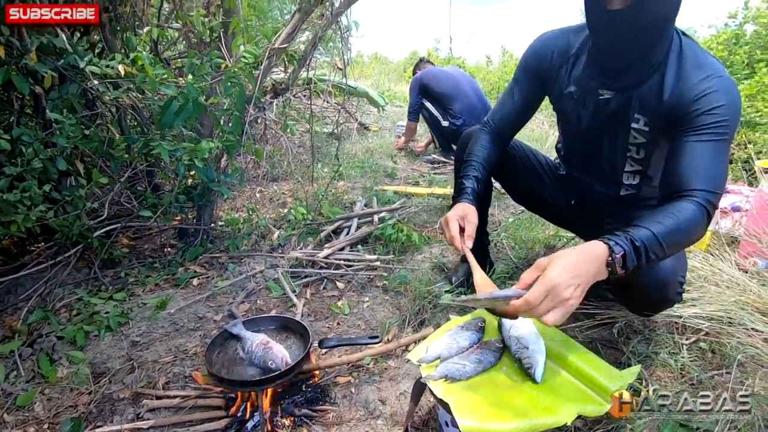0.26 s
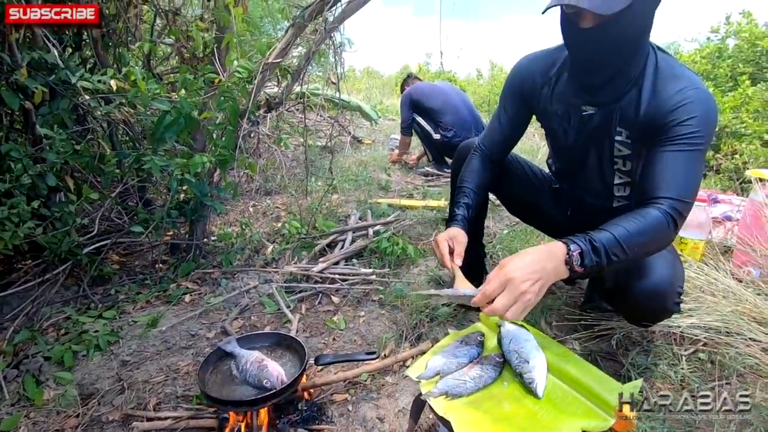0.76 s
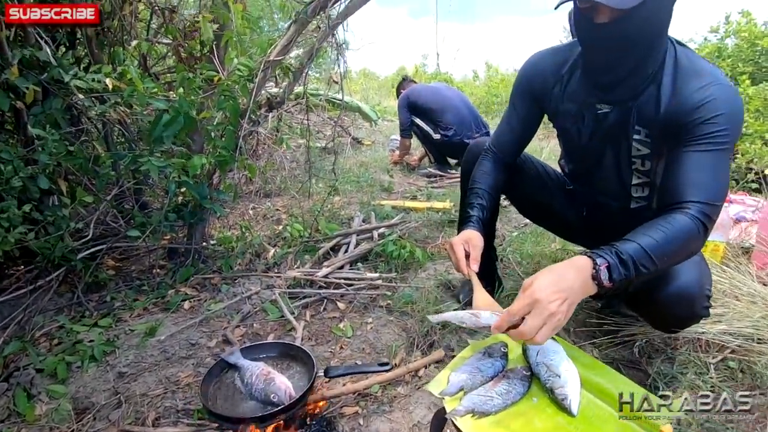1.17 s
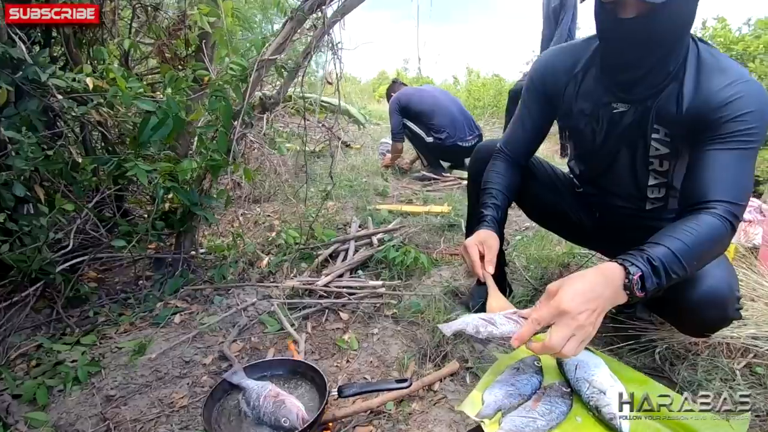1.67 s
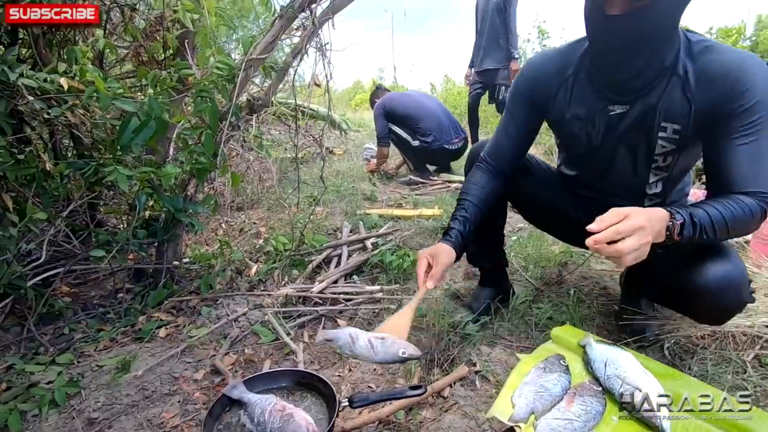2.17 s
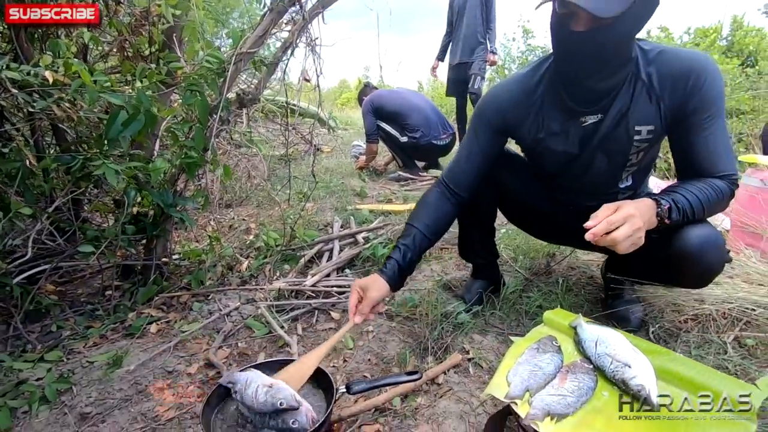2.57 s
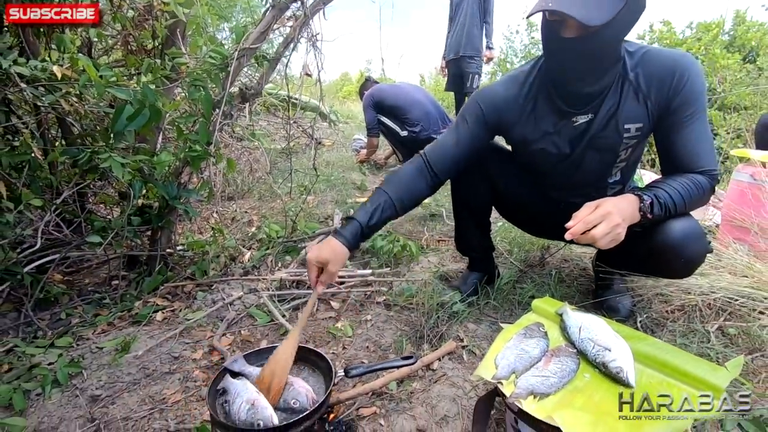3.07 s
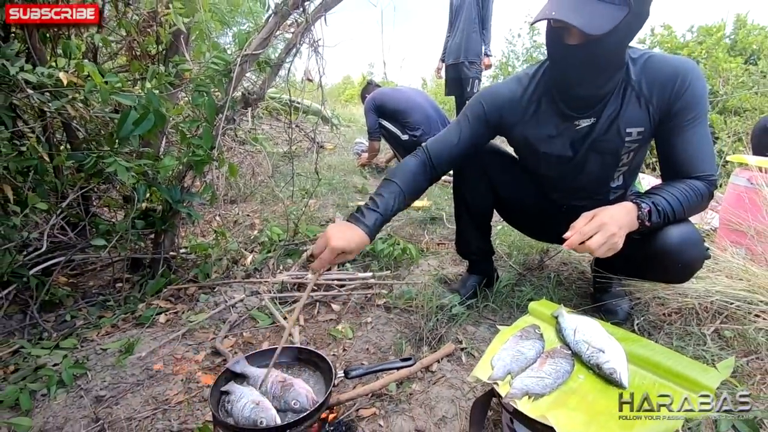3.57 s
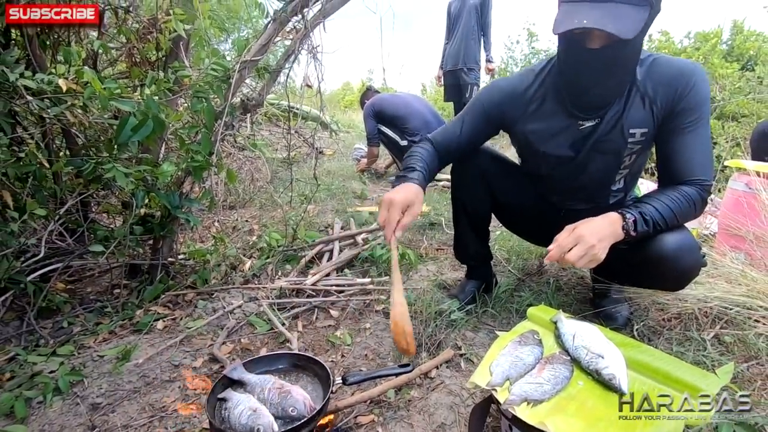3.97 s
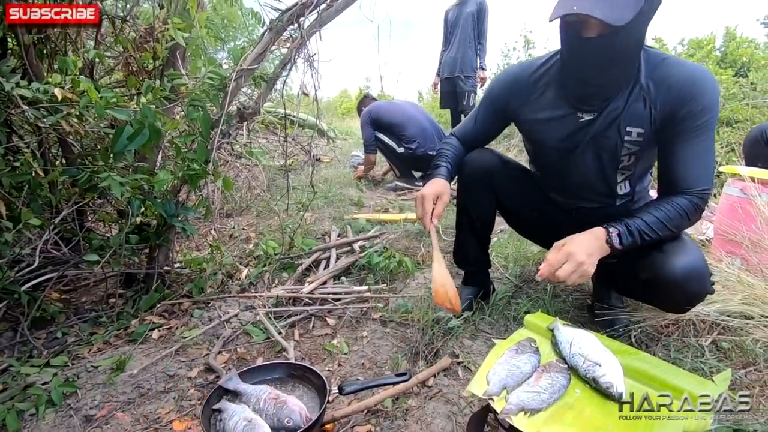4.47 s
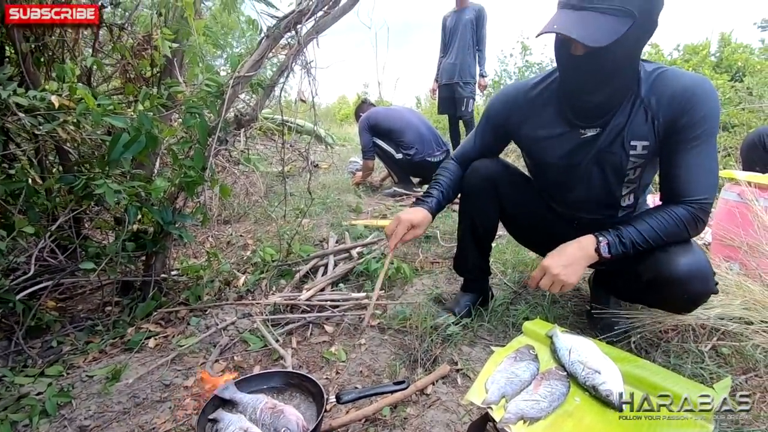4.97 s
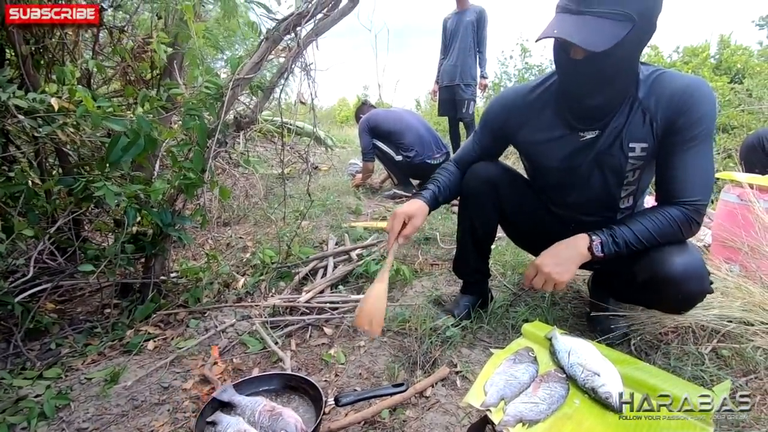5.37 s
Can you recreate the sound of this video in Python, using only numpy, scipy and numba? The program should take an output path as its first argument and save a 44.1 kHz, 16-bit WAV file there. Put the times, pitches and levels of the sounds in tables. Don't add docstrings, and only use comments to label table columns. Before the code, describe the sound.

A close, dense frying hiss fills the foreground while soft chops, a faint far engine hum and gusts of wind sit behind it.

```python
import sys
import numpy as np
from scipy import signal
from scipy.fft import rfft, irfft, next_fast_len
from scipy.io import wavfile
from scipy.ndimage import uniform_filter1d
from numba import njit

SR = 44100
rng = np.random.default_rng(int(sys.argv[2]) if len(sys.argv) > 2 else 0)


def magnitude_from_level(level_db):
    exponent = np.asarray(level_db, float) / 20
    return 10 ** exponent


def pcm_store(signal):
    levels = np.round(np.clip(np.atleast_2d(signal), -1, 1) * 32767)
    wavfile.write(sys.argv[1], SR, levels.astype(np.int16).T)


N = 247401

# start in seconds, peak in dB, crack in dB, thump in dB.
CHOPS = [
    (1.246, -33, -5, 17.5),
    (1.952, -31, 0, 5),
    (2.034, -26, 2, 12.5),
    (2.773, -27.5, 7, 10),
    (3.544, -19.5, 12, 4),
    (4.262, -27, -1, 10),
]


def colour(x, points):
    hz, db = np.transpose(points)
    size = next_fast_len(N + 4096)
    f = np.maximum(np.arange(size // 2 + 1) * SR / size, 1)
    gain = magnitude_from_level(np.interp(np.log(f), np.log(hz), db))
    return irfft(rfft(x, size) * gain, size)[..., :N]


def unit(x):
    return x / np.sqrt(np.mean(x ** 2))


def walk(rate):
    hold = int(SR / rate)
    stairs = np.repeat(rng.standard_normal(N // hold + 1), hold)
    return 0.7 * uniform_filter1d(uniform_filter1d(stairs, hold), hold)[:N]


def curves(table):
    s, *columns = np.transpose(table)
    return [np.interp(np.arange(N) / SR, s, c) for c in columns]


@njit
def svf(x, hz, width_hz):
    y, band, low = np.empty(len(x)), 0., 0.
    for i in range(len(x)):
        g, damping = np.tan(np.pi * hz[i] / SR), width_hz / hz[i]
        v = (band + g * (x[i] - low)) / (1 + g * (g + damping))
        band, low = 2 * v - band, low + 2 * g * v
        y[i] = damping * v
    return y


def resonance(stereo, hz, width_hz):
    return np.array([svf(port, hz, width_hz) for port in stereo])


@njit
def rings(s, hz, tau, rise, left, right, lag):
    out = np.zeros((2, N))
    for e in range(len(s)):
        w = 2j * np.pi * hz[e]
        ring, grow = np.exp((w - 1 / tau[e]) / SR), np.exp(-1 / rise[e] / SR)
        z, closed, turn = 1 + 0j, 1., np.exp(w * lag[e] / 2)
        start = int(s[e] * SR)
        for i in range(start, min(N, start + int(8 * tau[e] * SR))):
            z, closed = z * ring, closed * grow
            out[0, i] += left[e] * (1 - closed) ** 2 * (z * turn).imag
            out[1, i] += right[e] * (1 - closed) ** 2 * (z / turn).imag
    return out


def bubbles(surge, count, low_hz, high_hz, cycles, scatter_db, spread_s, bunch_db):
    when, pitch, size, ring = rng.random((count, 4)).T
    s = when * N / SR
    hz = low_hz * (high_hz / low_hz) ** pitch
    tau = cycles * (.5 + ring) / hz
    bunching = (surge + 0.47 * walk(30))[(s * SR).astype(int)]
    size_db = -scatter_db * np.log(1 - size) + bunch_db * bunching
    gain = magnitude_from_level(size_db) * np.sqrt(hz / tau)
    return rings(s, hz, tau, tau, gain, gain, spread_s * rng.standard_normal(count))


def sizzle():
    # seconds, boil in dB, brightness in dB (the small bubbles against the main ones).
    fry = [(0, -22.5, -3), (.1, -21, -5), (.65, -21.5, -6), (.87, -23.5, -7), (1.2, -23.5, -5),
           (1.45, -23, -2), (1.47, -24.5, -8), (1.582, -27.5, -6), (1.595, -22, -7), (1.71, -20, -4.5),
           (1.84, -22, -5.5), (2.45, -20, -6), (2.8, -22, -5), (2.97, -20, -7), (3.6, -21.5, -6.5),
           (4.3, -20, -8.5), (5.2, -19.5, -8), (5.61, -20, -7.5)]
    # seconds, lower hollow in Hz, upper hollow in Hz, upper against lower in dB.
    hollow = [(0.0, 3360, 3960, -8), (0.59, 3430, 4220, -3), (1.0, 3300, 3990, -4), (1.4, 3410, 4120, -6),
              (1.78, 3500, 4370, -7), (1.97, 3000, 3700, 0), (2.69, 3160, 3980, 6), (2.76, 3300, 4100, -7),
              (2.95, 3220, 4200, 1), (3.31, 2700, 3960, -3), (3.89, 2820, 4020, -2.5),
              (4.4, 2720, 3960, -6), (4.7, 2930, 4170, -3.5), (5.16, 3100, 4240, -5),
              (5.61, 3000, 4100, -4)]
    # seconds, frequency in Hz.
    rim = [(0, 1720), (1.6, 1695), (2.3, 2070), (3.5, 2150), (4.3, 2200), (5.61, 2200)]
    # frequency in Hz, level in dB per Hz.
    oil_colour = [(250, -28), (450, -20.5), (640, -21), (1000, -13), (1520, -1.5), (2170, -4.5),
                  (3000, -5.5), (4300, -3), (5800, -7.5), (7200, -14.5), (9500, -9.5), (11200, -23.5),
                  (13000, -40), (15000, -51)]
    boil_db, bright_db = curves(fry)
    lower_hz, upper_hz, upper_db = curves(hollow)
    rim_hz = curves(rim)[0]
    tilt = (rim_hz - 1700) / 500

    surge = walk(45)
    low = bubbles(surge, count=16000, low_hz=310.6, high_hz=2150, cycles=1.8,
                  scatter_db=1.0, spread_s=3e-5, bunch_db=1.0)
    mid = bubbles(surge, count=26000, low_hz=2082, high_hz=4570, cycles=2.44,
                  scatter_db=2.0, spread_s=1.6e-5, bunch_db=1.7)
    high = bubbles(surge, count=28000, low_hz=4716, high_hz=7210, cycles=2.2,
                   scatter_db=1.75, spread_s=1.6e-5, bunch_db=1.56)
    fine = bubbles(surge, count=50000, low_hz=6980, high_hz=17600, cycles=1.8,
                   scatter_db=0.9, spread_s=1.8e-5, bunch_db=1.76)

    lower = magnitude_from_level(-0.4 * upper_db) * 0.92 * resonance(mid, lower_hz, 490.0)
    upper = magnitude_from_level(0.5 * upper_db) * 0.94 * resonance(mid, upper_hz, 290.0)
    mid = 0.54 * mid + lower + upper
    mid = mid - 0.16 * (1.05 - tilt) * resonance(mid, 0.43 * lower_hz + 0.54 * upper_hz, 170.0)
    high = high + 0.15 * resonance(high, 1.34 * upper_hz, 450.0)
    low, mid, high, fine = (unit(colour(v, oil_colour)) for v in (low, mid, high, fine))
    low = low + 0.72 * tilt * resonance(low, np.full(N, 830.0), 190.0)

    low_db = 0.42 * boil_db - 0.26 * bright_db - 25.0 + 0.6 * walk(8.9)
    mid_db = boil_db - 0.18 + 0.68 * walk(11)
    high_db = 0.95 * boil_db + 1.0 * bright_db - 0.3 + 0.87 * walk(7.4)
    fine_db = 0.67 * boil_db + 0.58 * bright_db - 17.0 + 2.6 * walk(6.6)
    oil = magnitude_from_level(low_db) * low + magnitude_from_level(mid_db) * mid + magnitude_from_level(high_db) * high + magnitude_from_level(fine_db) * fine

    crackle = bubbles(surge, count=450, low_hz=1600, high_hz=4000, cycles=1.4,
                      scatter_db=1.5, spread_s=2.5e-5, bunch_db=.6)
    oil = oil + magnitude_from_level(boil_db - 16.0 + 5.55 * tilt) * unit(crackle)
    return oil - 0.75 * resonance(oil, rim_hz, 280.0)


def drone():
    # frequency in Hz, level in dB per Hz.
    hum = [(40, -8), (95, -16), (117, 1), (128, -3.5), (150, -9.5), (163, -1.5), (172, -3), (182, -6),
           (222, -10), (235, -9), (260, -16), (600, -32), (1000, -31.5)]
    mid, side = unit(colour(rng.standard_normal((2, N)), hum))
    return (mid + 1.06 * side * np.array([[1], [-1]])) * magnitude_from_level(-36.5 + 1.1 * walk(5.0))


def wind():
    # peak time in seconds, peak in dB, length in seconds, left minus right in dB.
    gusts = [(0.052, -34, 0.25, -8), (0.28, -31, .12, -11), (.46, -35, 0.15, -1), (0.703, -36.5, 0.19, -10),
             (0.956, -32.5, .12, -5), (1.072, -31, 0.1, -14), (1.2, -28, 0.15, -1), (1.54, -38, 0.17, -5),
             (1.723, -40.5, 0.083, -10), (1.923, -38, .08, 2), (2.067, -40, 0.25, -2), (2.45, -39, 0.13, 0),
             (2.752, -43, 0.27, 1), (2.963, -29, 0.078, 6), (3.09, -40, 0.17, -7), (3.975, -50, 0.1, 2),
             (4.611, -26, 0.27, 8), (4.95, -33.5, 0.32, -1), (5.144, -21.5, 0.097, -1),
             (5.235, -21.5, 0.12, 2), (5.354, -21, 0.059, 8), (5.427, -22.5, 0.1, 1),
             (5.597, -21, 0.087, 1)]
    # frequency in Hz, level in dB per Hz.
    buffet = [(8.8, -36), (15, -7), (36, 2), (52, 3), (70, 1), (171, -16.5), (300, -35.5), (390, -53),
              (660, -120)]
    breeze_db, rise_share = -45, 0.9
    s, db, length, pan_db = np.transpose(gusts)[:, :, None]
    late = (np.arange(N) / SR - s) / length
    late = np.where(late < 0, late / rise_share, late)
    swell = np.exp(-(late / 0.47) ** 2)
    gust = np.array([np.sum(magnitude_from_level(db + side * pan_db / 2) * swell, axis=0) for side in (1, -1)])
    push = magnitude_from_level(breeze_db) + gust
    bursts_db = 2.5 * np.array([walk(16), walk(16)])
    return unit(colour(rng.standard_normal((2, N)), buffet)) * push * magnitude_from_level(2.5 + bursts_db)


def ticks():
    # start in seconds, peak in dB.
    snaps = [
        (0.1286, -20),
        (0.2912, -22),
        (0.8977, -24),
        (1.592, -5),
        (1.733, -19),
        (4.6199, -24),
        (4.9846, -21),
        (5.1492, -24),
        (5.222, -16),
        (5.4894, -17),
    ]
    s, db = np.repeat(np.transpose(snaps), 16, axis=1)
    when, pitch, side = rng.random((len(s), 3)).T
    pitch = (np.arange(len(s)) % 16 + pitch) / 16
    gain = magnitude_from_level(db - 3.0 - 21.0 * np.abs(pitch - 0.45))
    hz = 5000 + 9800 * pitch
    return rings(s + 0.0013 * when, hz, 0 * s + 0.00028, 0 * s + 8e-5, gain, gain, 5e-5 * (side - .5))


def pops(table, cycles, lift_db, pan_db):
    s, db, hz = np.repeat(np.transpose(table), 4, axis=1)
    chance = rng.standard_normal((len(s), 5)).T
    small = np.arange(len(s)) % 4 > 0
    s = np.maximum(s + small * (0.0006 + 0.004 * np.abs(chance[2])), 0)
    db = db + small * (-11.0 + 1.44 * chance[3]) + lift_db
    hz = hz * np.exp(0.14 * small * chance[4])
    tau = cycles / hz * magnitude_from_level(0.5 * chance[0])
    pan_db = pan_db + 1.6 * chance[1]
    return rings(s, hz, tau, tau, magnitude_from_level(db + pan_db / 2), magnitude_from_level(db - pan_db / 2), 0 * s)


def chops():
    # frequency in Hz, level in dB, time to fall 60 dB in seconds.
    log_modes = [(124, -6.5, 0.037), (210, -4.5, 0.037), (390, -6, 0.035), (492, -5.5, 0.065),
                 (722, -6.5, .03), (1090, -6, 0.023), (1670, -10, 0.028), (2200, -10, .015)]
    s, db, crack_db, thump_db = np.repeat(np.transpose(CHOPS), len(log_modes), axis=1)
    hz, mode_db, t60 = np.tile(np.transpose(log_modes), len(CHOPS))
    chance = rng.standard_normal((len(s), 2)).T
    blow_db = 0.57 * crack_db * (hz > 800) + 0.94 * thump_db * (hz < 300)
    gain = magnitude_from_level(db + mode_db + 0.9 + blow_db + 1.2 * chance[0])
    hz = hz * (1 + 0.01 * chance[1])
    blow = rings(s, hz, t60 / np.log(1000), 0 * s + 0.00033, gain * magnitude_from_level(1.0), gain * magnitude_from_level(4.5), 0 * s - 1.2e-4)
    return blow + magnitude_from_level(-10.0) * np.roll(blow, int(0.0063 * SR), axis=1)


def splinters():
    s, db, crack_db, _ = np.repeat(np.transpose(CHOPS), 12, axis=1)
    when, pitch = rng.random((len(s), 2)).T
    hz = 550 * 4.5 ** ((np.arange(len(s)) % 12 + pitch) / 12)
    gain = magnitude_from_level(db + 0.5 * crack_db * (hz > 800) + 2.0)
    return rings(s + 0.0089 * when, hz, 1.3 / hz, 0.82 / hz, gain, gain * magnitude_from_level(3.5), 0 * s - 1.2e-4)


def scene():
    # start in seconds, peak in dB, pitch in Hz.
    lower_pops = [(0.2022, -5, 3180), (0.7006, -10, 3260), (0.7168, -19, 3280), (0.8078, -13, 3450),
                  (0.928, -15, 3120), (1.709, -13, 2620), (2.7413, -12, 3220), (2.7611, -12, 3360),
                  (3.1694, -14, 3110), (3.3117, -11.5, 2800), (3.6262, -10.5, 2720), (3.803, -11.5, 2600),
                  (3.9928, -8, 2640), (4.0178, -10.5, 2660), (4.124, -8, 2570), (4.2514, -12, 2900),
                  (4.359, -5.5, 2900), (4.3904, -6, 2790), (4.4109, -6.5, 3000), (4.444, -8.5, 3000),
                  (4.536, -8.5, 2700), (4.6203, -8.5, 2970), (4.9217, -7, 2820), (4.9565, -11, 2960),
                  (5.0255, -9, 2880), (5.1714, -15, 3100), (5.23, -8, 3250), (5.2694, -9, 3300),
                  (5.345, -10, 2780), (5.49, -4.5, 3400)]
    # start in seconds, peak in dB, pitch in Hz.
    upper_pings = [(0.5658, -7, 4100), (0.5897, -5, 4150), (0.6729, -8, 4260), (0.7628, -15, 4080),
                   (0.8065, -5.5, 3950), (0.8971, -6.5, 5140), (1.1402, -8, 4090), (2.1245, -7, 3900),
                   (2.2627, -15, 3900), (2.3301, -14, 3700), (2.3564, -7, 3730), (2.3669, -6.5, 3930),
                   (2.5515, -12, 4100), (2.9652, -9, 4100), (3.0704, -9, 4310), (3.0889, -6, 4040),
                   (3.2217, -8, 3830), (3.2794, -9, 3920), (3.459, -7.5, 3930), (3.469, -4, 3900),
                   (3.9594, -10, 3980), (4.153, -7.5, 3930), (4.4399, -15, 4030), (4.861, -8, 5230),
                   (4.8615, -14, 6160), (5.149, -8, 5900), (5.1715, -12.5, 3800), (5.2699, -8, 3930),
                   (5.349, -7, 5460)]
    # start in seconds, peak in dB, pitch in Hz.
    deep_glugs = [(1.5913, -9.5, 2380), (1.733, -14.5, 1530), (1.8477, -11, 2330), (2.0812, -14, 2250),
                  (2.3062, -16, 1480), (2.9716, -5.5, 2440), (3.5443, -8, 1630), (3.7419, -13, 1520),
                  (3.9333, -11, 1670), (3.9933, -26, 2450), (4.2188, -8, 1610), (4.2924, -6.5, 1990),
                  (4.5685, -3.5, 2470), (4.6205, -14, 1640), (4.6633, -13.5, 1500), (4.7755, -3.5, 2410),
                  (5.028, -6.5, 1315), (5.1781, -8, 2070), (5.2799, -6, 2000), (5.3612, -8.5, 2040),
                  (5.5735, -14, 1770)]
    # frequency in Hz, gain in dB.
    ports = [(150, -28), (500, 1), (1200, 3), (3000, 1.5), (6500, 2.5), (8300, 8.5), (10500, -1),
             (15000, -3.5)]
    fry = sizzle()
    fry = fry + pops(lower_pops, cycles=2.7, lift_db=17.5, pan_db=1.5)
    fry = fry + pops(upper_pings, cycles=4.5, lift_db=13.0, pan_db=0.6)
    fry = fry + pops(deep_glugs, cycles=2.7, lift_db=10.0, pan_db=-0.7)
    left, right = fry + drone() + ticks() + magnitude_from_level(-1.0) * chops() + splinters()
    mid, side = (left + right) / 2, colour((left - right) / 2, ports)
    return np.array([mid + side, mid - side]) + wind()


def top_cut(x):
    return signal.sosfilt(signal.butter(12, 15150, fs=SR, output="sos"), x)


def record(dry):
    # frequency in Hz, gain in dB.
    microphone = [(13800, 0), (14400, -3), (15100, -9)]
    soft = dry / (1 + (np.abs(dry) / 0.9) ** 6) ** (1 / 6)
    return top_cut(colour(soft, microphone))


dry = scene()
out = record(dry)
pcm_store(out)
```